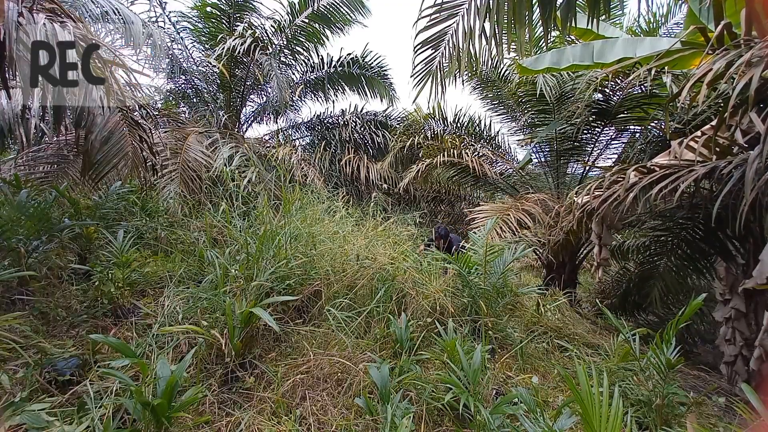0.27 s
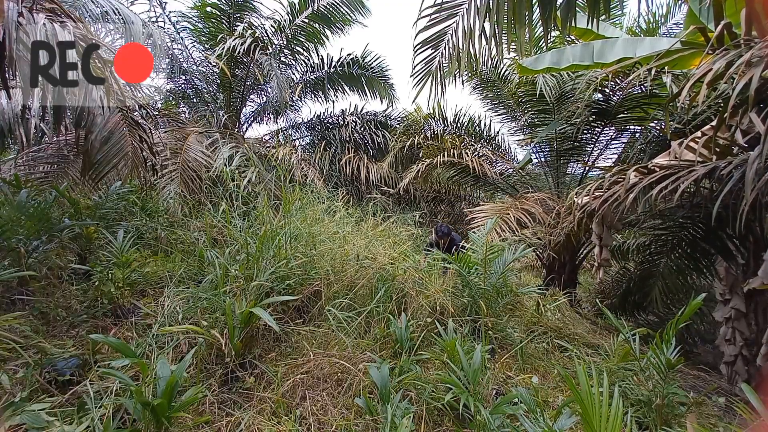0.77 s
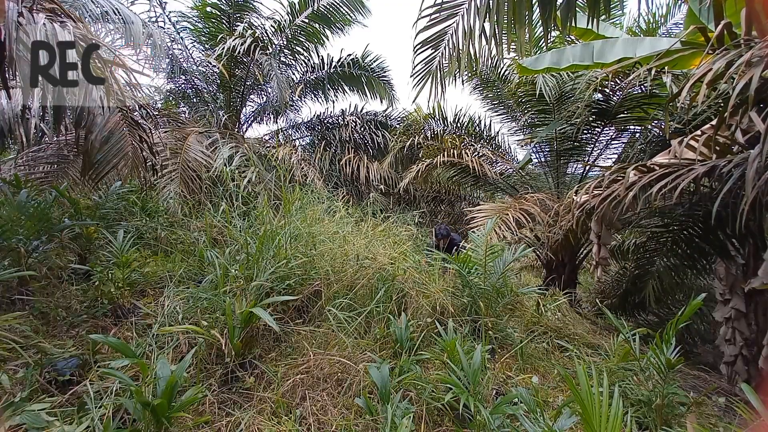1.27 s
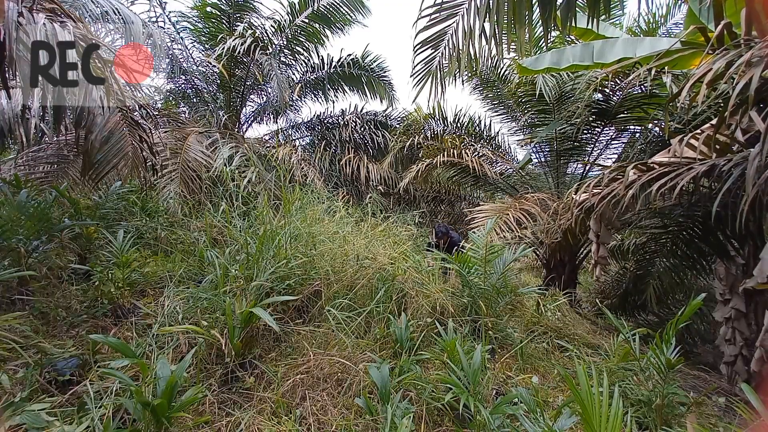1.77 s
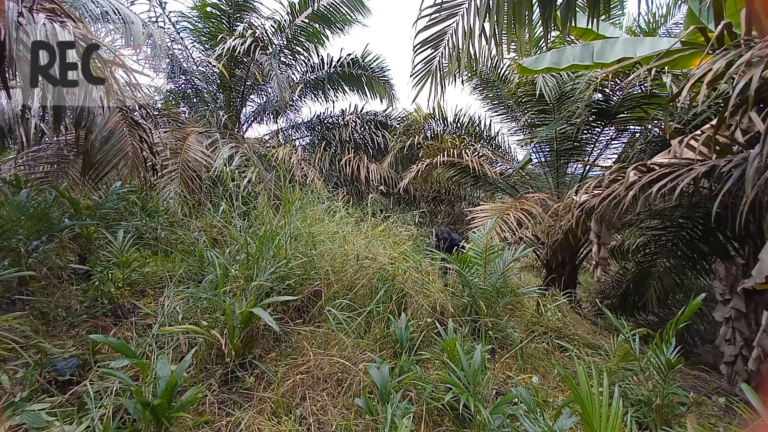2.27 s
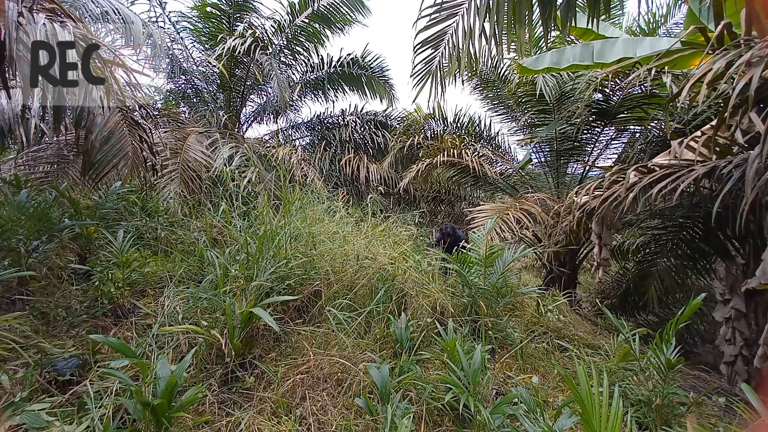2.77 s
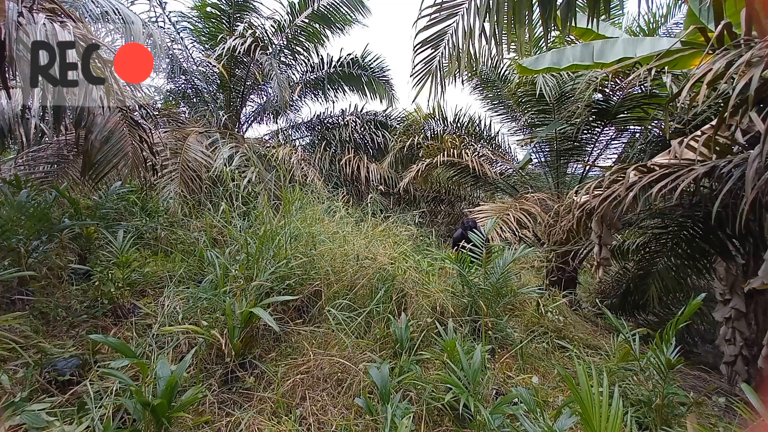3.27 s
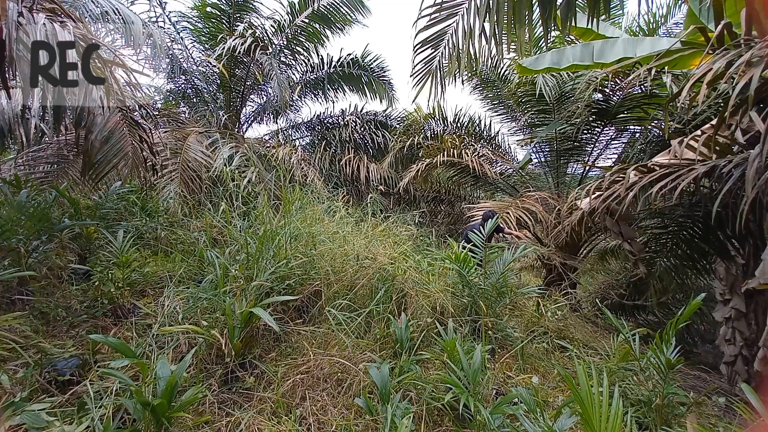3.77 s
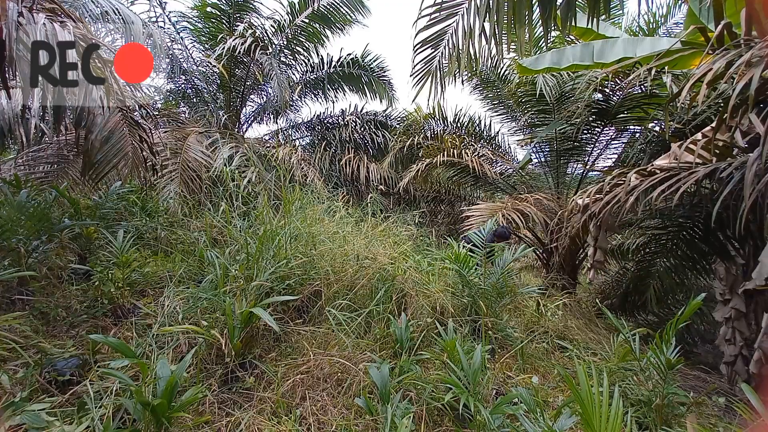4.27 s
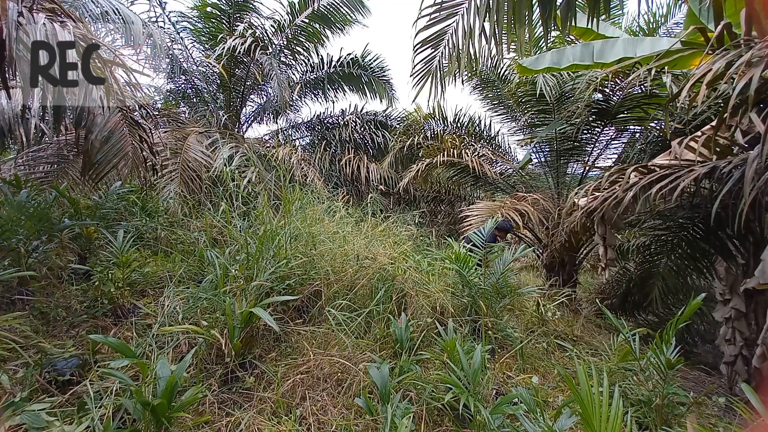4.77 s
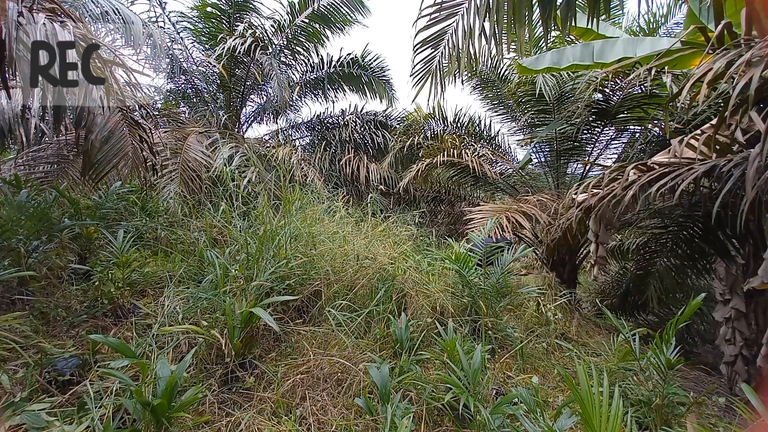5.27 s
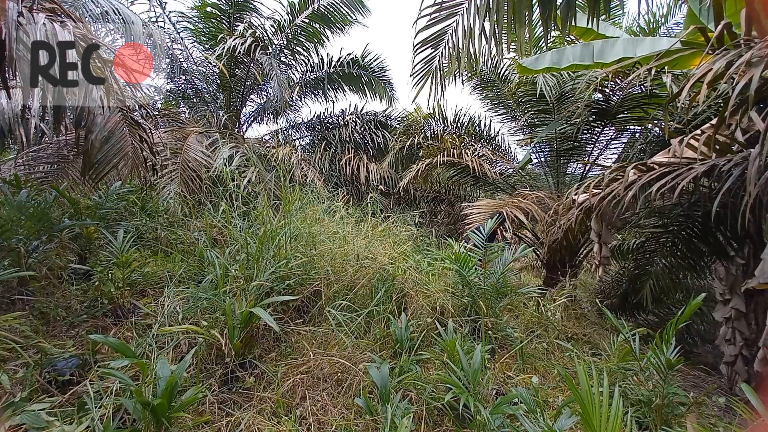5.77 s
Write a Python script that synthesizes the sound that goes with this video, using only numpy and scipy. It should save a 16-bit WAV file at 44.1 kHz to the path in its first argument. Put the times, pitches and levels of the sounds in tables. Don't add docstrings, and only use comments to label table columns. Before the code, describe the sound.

A worker some way off in overgrown greenery slashes weeds with a blade: a stroke at once, a sharper one soon after, then a weaker one. Smaller tugs, leafy rustling and stalk cracks follow as cut growth is dragged. Thin high cicadas drone all round and a cricket chirps briefly. Open-air stereo microphones add a faint hum and light wind bumps.

```python
import sys
import numpy as np
from scipy import signal
from scipy.fft import rfft, irfft
from scipy.io import wavfile
from scipy.ndimage import uniform_filter1d

SR = 44100
rng = np.random.default_rng(int(sys.argv[2]) if len(sys.argv) > 2 else 0)


def generate_wav(sig):
    pcm = np.round(np.clip(np.atleast_2d(sig).T, -1, 1) * 32767).astype(np.int16)
    wavfile.write(sys.argv[1], SR, pcm)


def decibels_to_gain(level_db):
    exponent = np.asarray(level_db, float) / 20
    return 10 ** exponent


N = 265923
TOP_HZ = 15900


def evened(x):
    return x / np.sqrt(np.mean(x ** 2, axis=-1, keepdims=True) + 1e-20)


def read(points, hz):
    f, value = np.transpose(points)
    return np.interp(np.log(np.minimum(hz, TOP_HZ - 400) + 1), np.log(f + 1), value)


def add(mix, s, sound):
    part = mix[:, max(round(s * SR), 0):][:, :sound.shape[1]]
    part += sound[:, :part.shape[1]]


def drift(rate):
    t = np.arange(0, N, 64) / SR
    f = np.geomspace(rate / 20, rate, 20)[:, None]
    phase = 2 * np.pi * (f * t + rng.random(f.shape))
    wave = (np.sin(phase) / np.sqrt(f)).sum(0)
    return np.interp(np.arange(N) / SR, t, evened(wave))


def partner(left, fresh, same):
    return same * left + np.sqrt(1 - same ** 2) * fresh


def fuzz(hz, width, same):
    a, b = rng.standard_normal((2, N)) + 1j * rng.standard_normal((2, N))
    z = np.array([a, partner(a, b, np.clip(same, 0, 1))])
    r = np.exp(-np.pi * width / SR)
    z = signal.lfilter([1], np.convolve([1, -r], [1, -r]), z)
    return evened((z * np.exp(2j * np.pi * hz * np.arange(N) / SR)).real)


def swell(s, hold, rise_db, fall_db):
    t = np.arange(0, N / SR + .002, .001) - s
    rise = abs(rise_db) * np.minimum(t, 0)
    fall = abs(fall_db) * np.maximum(t - hold, 0)
    return decibels_to_gain(2 * (rise - fall))


def per_sample(power):
    return np.interp(np.arange(N) / SR * 1000, np.arange(len(power)), np.sqrt(power))


# pitch_hz, level_db (per Hz)
AIR_COLOUR = [(82, -36), (140, -14.5), (190, -38), (340, -13), (440, -18.5), (719, -33.5), (1580, -33),
              (1970, -25), (2540, -28.5), (4680, -23.5), (5820, -20.5), (7520, -20.5), (9530, -33),
              (15600, -16.5)]
# pitch_hz, likeness (0 to 1)
AIR_LIKENESS = [(60, 0.27), (150, 0.89), (380, 0.74), (950, 1), (2380, 0.81), (5980, 0.84), (15000, 0.04)]
# pitch_hz, balance_db
AIR_BALANCE = [(60, 16), (180, -4.5), (550, 2.5), (1650, 0), (4970, 2.5), (15000, 2.5)]


def air(level_db=-47, patch_db=1.0):
    frames, hz = N // 256 + 5, np.fft.rfftfreq(1024, 1 / SR)
    a, b, c, d, patches = rng.standard_normal((frames, 513, 5)).T
    patches = uniform_filter1d(patches, size=12, axis=0)
    patches = evened(uniform_filter1d(patches, size=14, axis=1))
    same = np.clip(read(AIR_LIKENESS, hz), -1, 1)[:, None]
    left = a + 1j * b
    z = np.array([left, partner(left, c + 1j * d, same)])
    side = read(AIR_BALANCE, hz)[:, None] / 2 * np.array([1, -1])[:, None, None]
    z *= decibels_to_gain(read(AIR_COLOUR, hz)[:, None] + patch_db * patches + side)
    x = signal.istft(z, nperseg=1024, noverlap=768)[1][:, :N]
    return decibels_to_gain(level_db) * x / x.std()


# pitch_hz, width_hz, level_db, likeness (left to right)
CHORUS_BANDS = [(7056, 160, -58.5, 0.84), (7394, 340, -53.5, 0.12), (7685, 320, -51.5, 0.13),
                (4764, 490, -62.5, 0.85), (3073, 130, -71, 0.95), (2007, 70, -66.5, 1),
                (8630, 130, -65, 0.35)]


def chorus():
    buzz_db = 2.0 * evened(uniform_filter1d(rng.standard_normal(N), size=110))
    out = np.zeros((2, N))
    for hz, width, db, same in CHORUS_BANDS:
        level_db = db + 1.4 * drift(6.0) + buzz_db * (hz > 6000)
        out += decibels_to_gain(level_db) * fuzz(hz, width, same)
    return out


# time_s, level_db
NEAR_CICADA = [
    (0, -88),
    (1.3, -68),
    (4.3, -58.5),
    (4.64, -78),
    (6.03, -68),
]


def near_cicada():
    level_db = np.interp(np.arange(N) / SR, *np.transpose(NEAR_CICADA)) + 1.0
    return decibels_to_gain(level_db) * fuzz(6250, 98, 0.81)


# pitch_hz, width_hz, level_db
MOTOR_LINES = [(409.6, 2.14, -58.5), (574, 2.52, -73), (1895, 8.7, -70), (616, 17, -79), (465, 11, -72.5),
               (885, 8, -79.5), (293.7, 7.3, -73), (278, 8, -71.5)]


def hum():
    t, out = np.arange(N) / SR, np.zeros((2, N))
    for hz, width, db in MOTOR_LINES:
        tone = np.sqrt(2) * np.sin(2 * np.pi * hz * t + .5 * drift(width))
        out += decibels_to_gain(db) * (tone + .18 * fuzz(hz, 3 * width, .9))
    return out * decibels_to_gain([[.6], [-.6]])


# start_s, hold_s, level_db
AIR_PUFFS = [(0, 0.019, -53), (.66, 0.039, -65), (1.293, .01, -66), (3.79, .05, -67), (4.36, 0.022, -57.5),
             (4.82, .01, -62), (5.103, .01, -61), (5.252, .01, -64), (5.405, .1, -54), (5.71, .03, -57)]
CALM_DB, LUMP_DB = -72.5, 1.5
PUFF_RISE_DB_PER_S, PUFF_FALL_DB_PER_S = 200, 205


def breeze():
    power = decibels_to_gain(2 * CALM_DB)
    for s, hold, db in AIR_PUFFS:
        power = power + decibels_to_gain(2 * db) * swell(s, hold, PUFF_RISE_DB_PER_S, PUFF_FALL_DB_PER_S)
    return per_sample(power) * decibels_to_gain(LUMP_DB * drift(12.0)) * fuzz(92, 75, 0.83)


# start_s, peak_db,
# pitch_hz, length_s
LOW_THUDS = [
    (0, -28.5, 157, 0.014),
    (5.37, -45, 83, 0.044),
    (5.43, -45, 84, 0.054),
    (5.446, -47, 80, .03),
    (5.495, -51, 90, .025),
]


def low_thuds():
    out = np.zeros((2, N))
    for s, db, hz, length in LOW_THUDS:
        t = np.arange(0, length, 1 / SR)
        arch = np.sin(np.pi * t / length)
        add(out, s, decibels_to_gain(db) * arch * np.sin(2 * np.pi * hz * t) * np.ones((2, 1)))
    return out


# time_s, left_late_samples
WALK = [(0, 2.4), (2.6, 3.5), (3.3, 12), (4.1, 12), (4.4, 9), (6.03, 9.5)]


def left_lag(s):
    return np.round(np.interp(s, *np.transpose(WALK))).astype(int)


# start_s, hold_s, leaf_db, stem_db, stalk_db
BLADE_STROKES = [(.004, 0.002, -24.5, -33.5, -37), (.366, .004, -50, -67, -87),
                 (.645, 0.019, -22.5, -36, -37.5), (1.271, .008, -31, -44, -50),
                 (1.284, 0.011, -30.5, -42.5, -43), (1.7735, 0.0032, -35, -59, -55),
                 (2.422, 0.01, -39, -52, -50.5), (2.708, 0.0083, -43.5, -59, -62),
                 (3.957, .02, -39, -63, -73), (4.279, 0.014, -39.5, -58, -54),
                 (4.297, 0.12, -36, -52.5, -55.5), (5.238, 0.026, -36.5, -53, -53),
                 (5.264, 0.022, -32.5, -45.5, -49.5)]
WINDUP_S, WINDUP_DB, BITE_S = 0.02, -14.5, .0015
CUT_FALL_DB_PER_S, SETTLE_DB, SETTLE_DB_PER_S = 327, -15.5, 117
WOOD_LATE_S = 0.0044
GROUND_DB, FIRST_BLOW_DB = -3, 5.5


def stroke(s, hold):
    brush = decibels_to_gain(2 * WINDUP_DB) * swell(s - WINDUP_S, WINDUP_S, 2000, 2000)
    bite = swell(s, hold, 20 / BITE_S, CUT_FALL_DB_PER_S)
    settle = decibels_to_gain(2 * SETTLE_DB) * swell(s, hold, 2000, SETTLE_DB_PER_S)
    return brush + bite + settle


def strokes():
    power = 0
    for k, (s, hold, leaf_db, stem_db, stalk_db) in enumerate(BLADE_STROKES):
        ground_db = stalk_db + GROUND_DB + FIRST_BLOW_DB * (k == 0)
        db = np.array([leaf_db, stem_db, stalk_db, ground_db])
        leaf = stroke(s, hold)
        wood = stroke(s + WOOD_LATE_S * (k > 0), hold)
        power = power + decibels_to_gain(2 * db)[:, None] * [leaf, wood, wood, wood]
    return power


# start_s, hold_s, leaf_db, stem_db, stalk_db
SLOW_RUSTLES = [(0.896, 0.011, -60, -77, -75), (1.064, 0.027, -48.5, -61.5, -67.5),
                (1.35, 0.028, -44, -54.5, -61), (1.69, .02, -49, -64, -79), (1.857, 0.014, -53, -63, -69),
                (2.07, 0.092, -51, -69, -76), (2.337, 0.093, -46, -58.5, -63),
                (2.624, 0.1, -48.5, -58.5, -66), (3.02, 0.08, -50.5, -60, -69),
                (3.148, 0.12, -46.5, -58, -61.5), (3.336, 0.026, -43, -56.5, -55),
                (3.483, 0.009, -45.5, -49, -47), (3.525, 0.068, -46, -50, -48.5),
                (3.642, .06, -44.5, -50.5, -53.5), (3.765, 0.054, -47.5, -52, -55),
                (3.898, 0.021, -53, -51, -52), (4.011, 0.019, -46, -48.5, -54.5),
                (4.15, .12, -49.5, -61, -64.5), (4.452, 0.051, -41.5, -54, -61.5),
                (4.612, 0.17, -52, -65, -74), (4.93, .015, -49.5, -65, -72), (5.16, 0.17, -64, -76, -68.5),
                (5.296, 0.14, -38.5, -53, -56.5), (5.584, 0.19, -54, -74, -80)]
SWELL_DB_PER_S, FADE_DB_PER_S = 151, 150
TREAD_DB = -16


def rustles():
    power = 0
    for s, hold, leaf_db, stem_db, stalk_db in SLOW_RUSTLES:
        db = np.array([leaf_db, stem_db, stalk_db, stalk_db + TREAD_DB])
        power = power + decibels_to_gain(2 * db)[:, None] * swell(s, hold, SWELL_DB_PER_S, FADE_DB_PER_S)
    return power


STILLNESS = [
    -58,
    -110,
    -83,
    -69.5,
]


def movement():
    power = decibels_to_gain(2 * np.array(STILLNESS))[:, None] + strokes() + rustles()
    return [per_sample(p) for p in power]


def crackle(per_s, spread_db, wash):
    size_db = spread_db * np.minimum(rng.exponential(1, N), 3.1)
    clicks = decibels_to_gain(size_db) * (rng.random(N) < per_s / SR)
    t = np.arange(200) / SR
    grain = signal.oaconvolve(clicks, np.exp(-t / 0.0007))[:N]
    return (evened(grain) + wash) * rng.standard_normal((3, N))


# pitch_hz, level_db (per Hz)
WEED_COLOUR = [(59, -53), (100, -2.5), (355, 0), (488, -9.5), (566, -6.5), (810, -5.5), (1890, -1.5),
               (4780, -8), (6560, -14), (8630, -8), (14300, -3.5), (15600, -6.5)]
# lowest_hz, highest_hz, trim_db, likeness (left to right), balance_db
WEED_PARTS = [
    (6140, 18400, 1.5, 0.099, -3),
    (2150, 7570, 3.5, 0.41, 0.6),
    (490, 1640, -1, 0.49, 2.5),
    (96, 720, 0, 0.97, 1.2),
]


def weeds():
    t, hz = np.arange(N) / SR, np.fft.rfftfreq(N, 1 / SR)
    z = rfft(crackle(per_s=1500, spread_db=3, wash=3.0)) * decibels_to_gain(read(WEED_COLOUR, hz))
    late = np.maximum(np.arange(N) - left_lag(t), 0)
    out = np.zeros((2, N))
    for gain, (lo_hz, hi_hz, trim_db, same, pan_db) in zip(movement(), WEED_PARTS):
        band = 1 / np.sqrt((1 + (lo_hz / (hz + 1)) ** 8) * (1 + (hz / hi_hz) ** 8))
        direct, left, right = evened(irfft(z * band, N))
        same = np.clip(same, 0, 1)
        shared = np.sqrt(same) * np.array([direct[late], direct])
        apart = np.sqrt(1 - same) * np.array([left, right])
        out += (shared + apart) * gain * decibels_to_gain(trim_db + pan_db / 2 * np.array([[1], [-1]]))
    return out


# start_s, crack_peak_db, knock_peak_db, knock_pitch_hz
STALK_SNAPS = [(0.0056, -9, -16, 5380), (0.008, -14, -16, 1550), (0.0572, -21, -33, 3620),
               (0.3652, -26, -37, 3900), (0.6195, -20, -38, 5450), (0.634, -12, -26, 3360),
               (0.6447, -3, -18, 1940), (0.6465, -7, -24, 4000), (0.6714, -1, -22, 4740),
               (0.7189, -26, -34, 1490), (1.2714, -7, -21, 4460), (1.2845, -10, -19, 1490),
               (1.2732, -12, -26, 2500), (1.7732, -19, -35, 800), (1.785, -27, -40, 5060),
               (2.4253, -28, -33, 2260), (2.4373, -26, -29, 1300), (2.7016, -21, -39, 5320),
               (3.4655, -36, -29, 1740), (3.486, -32, -23, 2200), (3.5459, -34, -24, 2500),
               (3.586, -28, -17, 2900), (3.6313, -33, -26, 3400), (3.9634, -27, -38, 4950),
               (4.0037, -31, -29, 2910), (4.2959, -28, -27, 1100), (4.3974, -24, -33, 5100),
               (4.4986, -22, -21, 4400), (5.2659, -22, -25, 4700), (5.7918, -19, -42, 4800)]
SNAP_T60_S, SNAP_PAN_DB = .009, -2


def snaps():
    out, t = np.zeros((2, N)), np.arange(1500) / SR
    bright = signal.butter(2, 8000, "high", fs=SR, output="sos")
    for s, crack_db, knock_db, hz in STALK_SNAPS:
        burst = rng.standard_normal((2, 1500))
        burst = burst[0] + 0.12 * burst
        crack = signal.sosfilt(bright, burst * decibels_to_gain(-60 * t / SNAP_T60_S))
        wood = signal.butter(1, [hz / 1.4, hz * 1.4], "band", fs=SR, output="sos")
        knock = signal.sosfilt(wood, burst * decibels_to_gain(-28 * t / SNAP_T60_S))
        ring = decibels_to_gain(crack_db - 1.5) * crack / abs(crack).max()
        ring += decibels_to_gain(knock_db - 3) * knock / abs(knock).max()
        ring[0] = np.roll(ring[0], int(left_lag(s)))
        add(out, s, ring * decibels_to_gain([[SNAP_PAN_DB], [0]]))
    return out


# time_s, peak_db
CRICKET_CHIRPS = [(1.4112, -41), (1.4495, -40), (1.5678, -40), (1.6038, -38.5), (1.6364, -37), (1.788, -41),
                  (1.8282, -38), (1.8612, -38)]


def cricket():
    out, t = np.zeros((2, N)), np.arange(0, .016, 1 / SR)
    tone = np.sin(2 * np.pi * np.cumsum(5080 - 27000 * t) / SR)
    note = tone * np.sin(np.pi * (t / .016) ** 1.4)
    for s, db in CRICKET_CHIRPS:
        add(out, s - .006, decibels_to_gain(db - 2.5) * note * np.ones((2, 1)))
        add(out, s + .009, decibels_to_gain(db - 7) * note * np.array([[1], [.6]]))
        add(out, s + .019, decibels_to_gain(db - 13) * note * np.array([[.6], [1]]))
    return out


def scene():
    place = air() + chorus() + near_cicada() + hum() + breeze() + low_thuds()
    return place + weeds() + snaps() + cricket()


def roll_off(x):
    return signal.sosfilt(signal.butter(12, 16950, fs=SR, output="sos"), x)


def record(dry):
    bass_cut = signal.butter(3, 62, "high", fs=SR, output="sos")
    mix = signal.sosfilt(bass_cut, dry)
    limit = signal.firwin(1023, TOP_HZ, window=("kaiser", 9), fs=SR)
    mix = signal.oaconvolve(mix, limit[None], "same")
    return roll_off(mix)


dry = scene()
out = record(dry)
generate_wav(out)
```